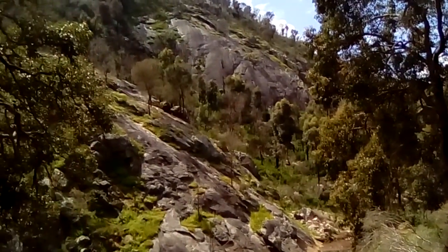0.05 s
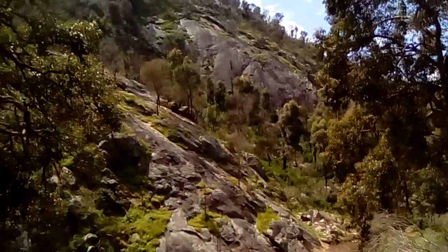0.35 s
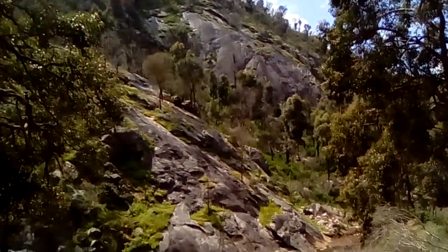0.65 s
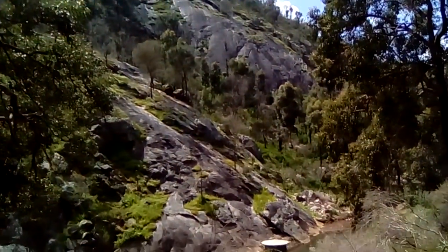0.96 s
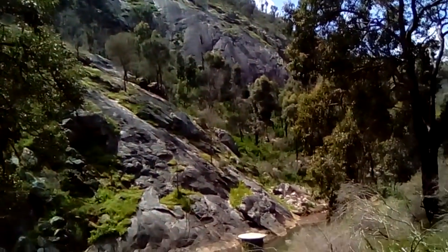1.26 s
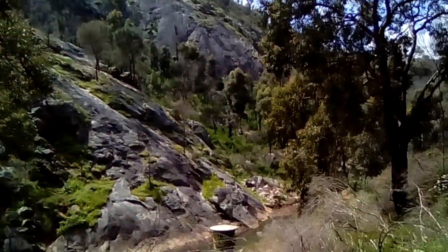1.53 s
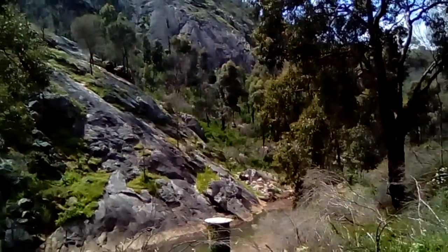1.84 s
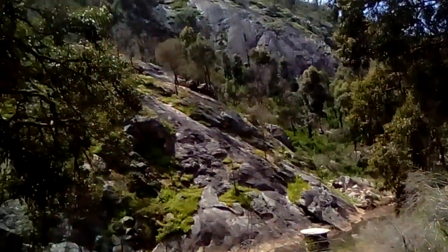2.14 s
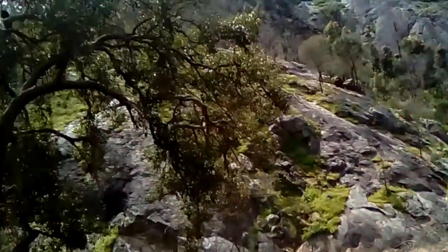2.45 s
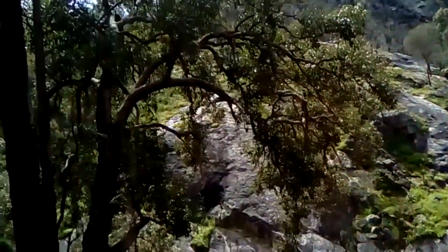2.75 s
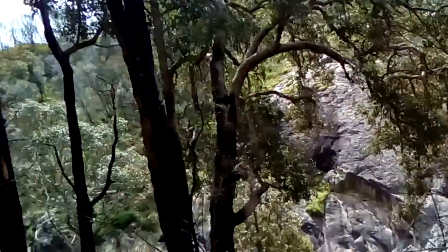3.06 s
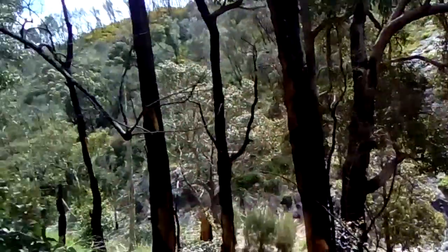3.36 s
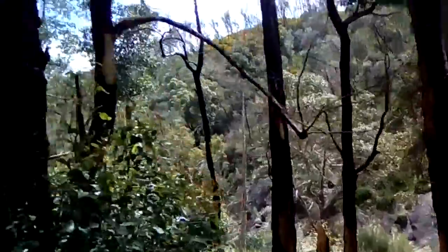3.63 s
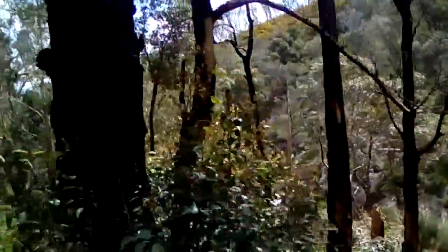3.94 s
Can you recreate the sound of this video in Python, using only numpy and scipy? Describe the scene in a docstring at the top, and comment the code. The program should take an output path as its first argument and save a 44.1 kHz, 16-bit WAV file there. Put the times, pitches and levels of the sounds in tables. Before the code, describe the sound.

Small birds calling among trees, followed by low wind rumble and light handling rustles.

```python
"""Birds on a breezy hillside

Small birds call in the woods: two slurred chirps, sharp chips, then a quick see-saw series, all
echoed by the trees. A light wind starts to buffet the microphone, while fingers rustle and tick on
its casing. Under it lie the far wash of the valley and the recorder's thin whine."""
import sys
import numpy as np
from scipy import signal
from scipy.fft import rfft, irfft
from scipy.io import wavfile
from scipy.ndimage import uniform_filter1d

SR = 44100
rng = np.random.default_rng(int(sys.argv[2]) if len(sys.argv) > 2 else 0)


def generate_wav(signal):
    """Clip the signal to [-1, 1] and save it as 16-bit WAV at the path in sys.argv[1]."""
    frames = np.transpose(np.atleast_2d(signal))
    scaled = np.clip(frames, -1, 1) * 32767
    pcm = np.round(scaled).astype(np.int16)
    wavfile.write(sys.argv[1], SR, pcm)


N = 176400
TIME = np.arange(N) / SR


def amp(db):
    """Turns decibels into a number to multiply a sound by."""
    return 10 ** (np.asarray(db) / 20)


def unit(x):
    """Scales a signal to an average strength (rms) of 1."""
    return x / np.sqrt(np.mean(x ** 2) + 1e-20)


def add(mix, start_s, sound):
    """Adds a sound into the mix at a given time."""
    part = mix[max(round(start_s * SR), 0):][:len(sound)]
    part += sound[:len(part)]


def noise(colour):
    """Noise of strength 1, its tone set by rows of pitch_hz, relative_db."""
    pitch_hz, relative_db = np.transpose(colour)
    hz = np.fft.rfftfreq(N, 1 / SR)
    gain = amp(np.interp(np.log(hz + 1), np.log(pitch_hz + 1), relative_db))
    return unit(irfft(rfft(rng.standard_normal(N)) * gain, N))


def drift(rate_hz):
    """A smooth random wobble; a higher rate makes it quicker."""
    hz = np.fft.rfftfreq(N, 1 / SR)
    return unit(irfft(rfft(rng.standard_normal(N)) * np.exp(-(hz / rate_hz) ** 2), N))


def level(points):
    """Joins rows of time_s, level_db into a volume curve."""
    return amp(np.interp(TIME, *np.transpose(points)))


def air():
    """The far wash of leaves and water in the valley, over a low, puffing murmur of air."""
    # tone of the wash and of the murmur: pitch_hz, relative_db
    wash_colour = [(180, -41), (300, -3), (500, 0.5), (701, 1), (842, 4), (1150, -0.5), (1810, -1.5),
                   (2440, -5), (3290, -4), (6520, -10.5), (8640, -25.5), (10200, -25.5), (10700, -16),
                   (11300, -22.5), (11900, -29), (13500, -26), (15000, -12), (16000, -22)]
    murmur_colour = [(15, -14), (40, -6.5), (90, 5), (160, -11), (300, -27.5), (700, -41)]
    puff_db = 5 * np.tanh(drift(rate_hz=16))
    murmur = unit(noise(murmur_colour) * amp(puff_db))
    wash = noise(wash_colour) * amp(.5 * drift(rate_hz=13))
    return amp(-59) * (wash + murmur)


def turbulence(colour, lumpy_db, lump_hz, steady_s):
    """Swirling air: noise in quick lumps, with its slower swells evened out."""
    lumpy = noise(colour) * amp(lumpy_db * drift(lump_hz))
    power = uniform_filter1d(lumpy ** 2, int(steady_s * SR))
    return lumpy / np.sqrt(np.abs(power) + 1e-9)


def wind():
    """Wind buffets the microphone: low rumble and finer flutter swell together, with single eddies."""
    # strength of the rumble and of the flutter, before buffeting: time_s, level_db
    rumble_curve = [(0, -38.5), (.03, -57), (.14, -59.5), (.3, -65.5), (.38, -49), (.43, -47.5), (.48, -65),
                    (1.0, -60), (1.4, -62.5), (1.84, -52.5), (1.93, -45), (2.01, -47.5), (2.04, -39.5),
                    (2.2, -43), (2.38, -45.5), (2.46, -36.5), (2.52, -41.5), (2.66, -41), (2.70, -32),
                    (2.8, -35), (2.9, -25), (3.04, -23.5), (3.16, -21.5), (3.42, -27), (3.6, -25.5),
                    (3.65, -25.5), (3.69, -31), (3.78, -31), (3.84, -39.5), (4, -33)]
    flutter_curve = [(1.8, -72), (2.05, -65.5), (2.4, -59.5), (2.47, -57), (2.52, -64), (2.66, -73),
                     (2.71, -51.5), (2.77, -62), (2.83, -46.5), (2.92, -37.5), (3.14, -35.5), (3.18, -42.5),
                     (3.22, -41), (3.44, -44), (3.5, -44.5), (3.65, -39), (3.7, -50), (3.79, -49),
                     (3.83, -64), (4, -61)]
    # tone of each: pitch_hz, relative_db
    rumble_colour = [(15, -35), (35, -2.5), (60, -4), (115, 2.5), (190, -4), (280, -11), (400, -21.5),
                     (700, -52), (1500, -74.5)]
    flutter_colour = [(100, -7), (250, -10), (380, -0.5), (600, -5), (800, -15), (1200, -29.5), (2500, -48),
                      (6000, -73)]
    buffet_db = 4 * np.tanh(drift(rate_hz=32))
    rumble = turbulence(rumble_colour, lumpy_db=3.5, lump_hz=40, steady_s=.06)
    rumble *= level(rumble_curve) * amp(.48 * buffet_db)
    flutter = turbulence(flutter_colour, lumpy_db=6, lump_hz=108, steady_s=.04)
    flutter = 3.7 * np.tanh(flutter / 3.7)  # rounds off the tallest peaks
    flutter *= level(flutter_curve) * amp(buffet_db)
    bass_cut = signal.butter(2, 54.6, "high", fs=SR, output="sos")  # the microphone loses deep bass
    return signal.sosfilt(bass_cut, rumble + flutter + eddies())


def whistle(hz, db, waver=.0089):
    """One bird note with soft ends; the more its pitch wavers, the rougher it is."""
    pitch = hz * (1 + waver * drift(rate_hz=330)[:len(hz)])
    fade = signal.windows.tukey(len(hz), .54)
    return amp(db) * fade * np.sin(2 * np.pi * np.cumsum(pitch) / SR)


def far_bird():
    """The farther bird slurs its chirps, each note one smooth bend of pitch."""
    # its notes: start_s, length_s, first_hz, middle_hz, last_hz, level_db
    chirps = [(0.178, 0.048, 5880, 5980, 6030, -59), (0.189, 0.019, 2960, 3000, 3020, -60),
              (0.211, 0.012, 5470, 5300, 4100, -54.5), (.226, 0.025, 5570, 5570, 5540, -60),
              (.224, 0.016, 3610, 3375, 3440, -48.5), (0.233, 0.033, 3550, 3755, 3710, -49.5),
              (0.624, 0.056, 2886, 3026, 3330, -56.5), (0.628, 0.014, 5730, 5800, 6000, -54.5),
              (0.642, 0.02, 5940, 6060, 6150, -48.5), (0.622, 0.027, 5260, 5360, 5700, -59),
              (0.654, 0.04, 4200, 3970, 4000, -54), (0.67, 0.0088, 6000, 4900, 3470, -45.5),
              (0.673, 0.016, 3690, 3300, 3260, -45), (1.013, 0.0086, 7480, 5870, 4320, -50),
              (1.148, .017, 5640, 4730, 4100, -45.5), (3.985, 0.022, 3270, 4400, 4750, -56.5)]
    out = np.zeros(N)
    for start, length, first, middle, last, db in chirps:
        bend = np.polyfit([0, .5, 1], [first, middle, last], 2)
        pitch = np.polyval(bend, np.linspace(0, 1, int(length * SR)))
        add(out, start, whistle(pitch, db, waver=.017))
    return out


def woods(call, echo_db):
    """A call with a few clear echoes, scatter from near trees and a longer tail from the hillside."""
    # echoes off trunks and rock: delay_s, relative_db
    echoes = [(.0031, -14), (.0072, -13.5), (0.0182, -15.5), (.046, -15), (.142, -20)]
    t = TIME[:SR]
    build_up = 1 - np.exp(-t / .003)
    response = np.zeros(SR)
    for fade_s in (.42, 1.0):  # time to fall 60 dB: trees, then hillside
        tail = rng.standard_normal(SR) * np.exp(-np.log(1000) * t / fade_s) * build_up
        response += amp(-6.5) * unit(tail) / np.sqrt(SR)
    for delay, db in echoes:
        add(response, delay, amp([db]))
    return call + amp(echo_db) * signal.fftconvolve(call, response)[:N]


def near_bird():
    """The nearer bird gives two plunging chips, then rising and falling notes in turn."""
    # sharp chips and rising notes: start_s, length_s, level_db
    chips = [(0.935, 0.0083, -45.5), (1.071, 0.0128, -42.5)]
    rising = [(1.196, 0.042, -43), (1.339, 0.038, -42), (1.482, 0.035, -42), (1.638, 0.029, -41.5)]
    # falling notes: start_s, length_s, pitch_hz, level_db
    falling = [(1.283, 0.033, 3540, -49.5), (1.423, 0.049, 3595, -51.5), (1.584, 0.018, 3445, -43)]
    chip_top_hz, chip_drop_hz, fall_hz = 3510, 1130, 257
    low_hz, high_hz, rise_s, sag_hz_per_s = 2730, 3296, .023, 9000
    out = np.zeros(N)
    for start, length, db in chips:
        progress = np.linspace(0, 1, int(length * SR))
        add(out, start, whistle(chip_top_hz - chip_drop_hz * progress ** 2, db))
    for start, length, db in rising:
        t = np.arange(0, length, 1 / SR)
        climb = np.sin(np.pi / 2 * np.minimum(t / rise_s, 1)) ** 2
        sag = sag_hz_per_s * np.maximum(t - rise_s, 0)
        pitch = low_hz + (high_hz - low_hz) * climb - sag
        add(out, start, whistle(pitch, db - 6.5 * (1 - climb)))  # louder as it climbs
    for start, length, hz, db in falling:
        add(out, start, whistle(hz + fall_hz * np.linspace(.5, -.5, int(length * SR)), db))
    return out


def knocks():
    """Each soft knock on the casing is one swing of pressure: the narrower, the brighter."""
    # knocks: time_s, width_s, peak_db
    bumps = [(1.0097, 0.00068, -35.5), (1.826, 0.00039, -40.5), (2.209, 0.00039, -37)]
    out = np.zeros(N)
    for time, width, db in bumps:
        offset = (TIME - time) / width
        swing = -offset / (1 + offset ** 2) ** 2
        out += amp(db) * swing / swing.max()
    return out


def eddies():
    """Each passing eddy, a small whirl of air, is a dip of pressure between two softer rises."""
    # whirls that hit the microphone: time_s, width_s, depth_db
    whirls = [(1.915, 0.004, -27), (2.037, .003, -27.5), (2.057, 0.0025, -29), (2.132, 0.0028, -31.5),
              (2.166, 0.0028, -23.5), (2.324, 0.0036, -22), (2.455, 0.0027, -25.5), (2.482, .0036, -29.5),
              (2.686, 0.0021, -25.5), (2.713, 0.0017, -25.5), (2.777, 0.0041, -26), (2.872, 0.0027, -15),
              (2.914, 0.0019, -16), (2.954, 0.0017, -22), (2.983, 0.0021, -18.5), (3.015, 0.0012, -24),
              (3.034, 0.0025, -20), (3.054, .0026, -10.5), (3.080, .0014, -16), (3.163, 0.0017, -13),
              (3.193, .0011, -20.5), (3.265, 0.0021, -19), (3.480, 0.0017, -16.5), (3.506, 0.0015, -16.5),
              (3.544, 0.0022, -10.5), (3.642, 0.0033, -13), (3.737, 0.0012, -21), (3.794, 0.0024, -22)]
    out = np.zeros(N)
    for time, width, db in whirls:
        offset = (TIME - time) / width
        out -= amp(db) * (1 - 3 * offset ** 2) / (1 + offset ** 2) ** 3
    return out


def friction(centre_hz, octaves, grain_db, size=8192):
    """Grainy rubbing noise around one pitch, heard through the casing."""
    # how the casing passes sound to the microphone: pitch_hz, relative_db
    casing = [(300, -12), (700, 14.5), (6500, 0.5), (7100, -14.5), (8300, -13), (9500, -14), (11000, -20),
              (16000, -18)]
    hz = np.fft.rfftfreq(size, 1 / SR) + 1
    grains = rng.standard_normal(size) * amp(grain_db * drift(rate_hz=500)[:size])
    band = 1 / (1 + (np.log2(hz / centre_hz) / octaves / 2) ** 2) ** 3
    return unit(irfft(rfft(grains) * band * amp(np.interp(hz, *np.transpose(casing)))))


def handling():
    """Fingers scuff and rub the casing."""
    # quick ticks and scuffs: time_s, decay_s, level_db, centre_hz
    scuffs = [(2.094, 0.0039, -46.5, 1290), (2.224, 0.0024, -44, 1500), (2.357, 0.0023, -36, 1390),
              (2.357, 0.0045, -38, 5500), (2.364, .005, -41, 5240), (2.378, .003, -43.5, 6000),
              (2.387, 0.0045, -39, 1680), (2.387, 0.0042, -39, 6000), (2.473, 0.0028, -41, 5800),
              (2.796, 0.0033, -42, 1580), (3.027, 0.00073, -34.5, 9000), (3.259, 0.0027, -37.5, 2080),
              (3.353, 0.0054, -36.5, 1950), (3.3575, .0008, -37, 10000), (3.368, 0.0015, -42, 3800),
              (3.429, 0.0033, -48.5, 2800), (3.613, 0.0032, -39.5, 2130), (3.685, 0.0019, -35.5, 2400),
              (3.705, 0.002, -33, 1980), (3.740, .003, -42, 1700)]
    # longer rubs: start_s, length_s, level_db, centre_hz, spread_octaves
    rubs = [(2.333, 0.12, -52, 1380, 0.73), (2.386, 0.073, -55, 5300, 0.4), (2.418, 0.02, -70, 9150, 0.099),
            (3.318, 0.069, -50.5, 2600, 1.4), (3.347, 0.026, -48.5, 6000, 0.99),
            (3.581, .08, -54.5, 1600, 0.97), (3.662, 0.1, -51.5, 1490, 1.3),
            (3.569, .33, -60.5, 3300, 0.24)]
    rise_s = .0007
    out = np.zeros(N)
    for time, decay, db, hz in scuffs:
        scuff = friction(hz, octaves=.91, grain_db=3.5)
        t = TIME[:len(scuff)]
        fade = np.minimum(t / rise_s, 1) * np.exp(-t / decay)
        add(out, time - rise_s, amp(db) * scuff * fade)
    for start, length, db, hz, octaves in rubs:
        rub = friction(hz, octaves, grain_db=4.5)[:int(length * SR)]
        add(out, start, amp(db) * rub * signal.windows.tukey(len(rub), .7))
    return out


def snap():
    """The casing gives once: a sharp crack and a very short ring."""
    # tones the casing rings at: pitch_hz, relative_db
    tones = [(3750, 1.5), (4500, -6), (5500, -4), (6700, -11), (8600, -21.5)]
    start_s, ring_peak_s, crack_decay_s = 3.3592, .00047, .0017
    t = TIME[:SR // 20]
    ring = sum(amp(db) * np.sin(2 * np.pi * (hz * t + rng.random())) for hz, db in tones)
    ring *= t / ring_peak_s * np.exp(1 - t / ring_peak_s)
    crack = friction(centre_hz=9000, octaves=1.5, grain_db=2)[:len(t)] * np.exp(-t / crack_decay_s)
    out = np.zeros(N)
    add(out, start_s, amp(-24) * ring + amp(-32) * crack)
    return out


def scene():
    """Everything that reaches the microphone, in one channel."""
    calls = woods(far_bird(), echo_db=2) + woods(near_bird(), echo_db=1)
    return (calls + wind() + knocks() + handling() + snap() + air())[None]


def record(dry):
    """The recorder adds a thin whine and hiss, then cuts the highest treble."""
    # tones of the whine: pitch_hz, level_db
    whine_tones = [(6449, -82), (10880, -76.5), (12898, -95)]
    # tone of the hiss: pitch_hz, relative_db
    hiss_colour = [(13500, -42.5), (14100, -16), (14700, -8), (15600, -11)]
    whine = sum(amp(db) * np.sqrt(2) * np.sin(2 * np.pi * hz * TIME) for hz, db in whine_tones)
    hiss = amp(-82.5) * noise(hiss_colour)
    treble_cut = signal.firwin(511, 15620, window=("kaiser", 9), fs=SR)
    return signal.oaconvolve(dry + whine + hiss, treble_cut[None], "same")


dry = scene()
out = record(dry)
generate_wav(out)
```